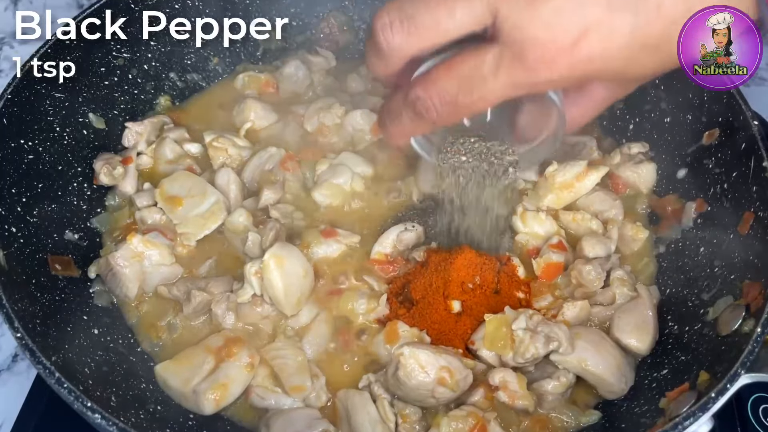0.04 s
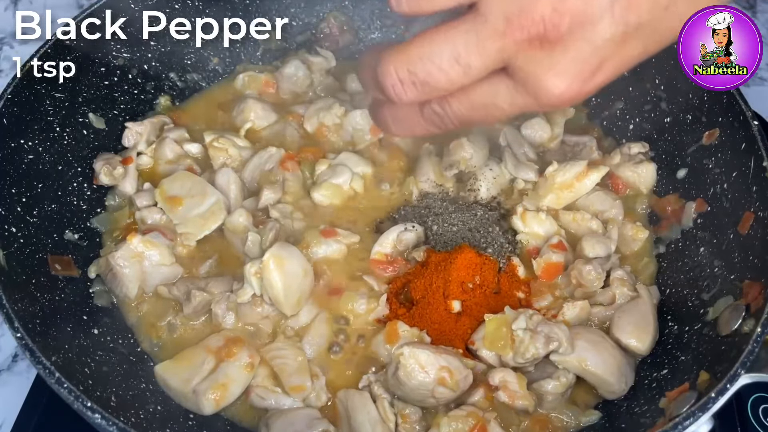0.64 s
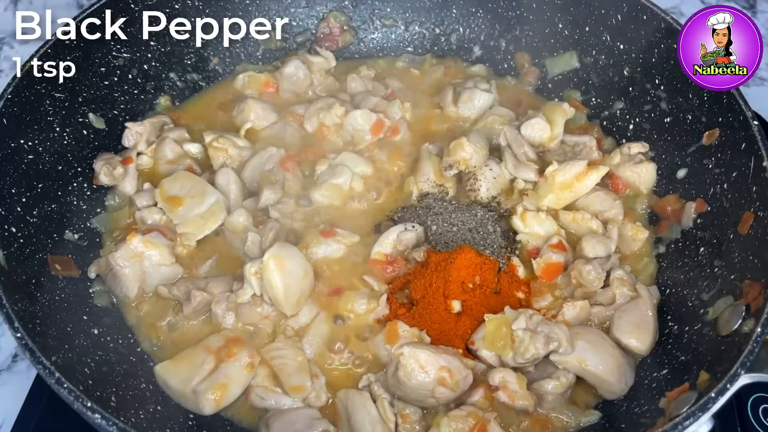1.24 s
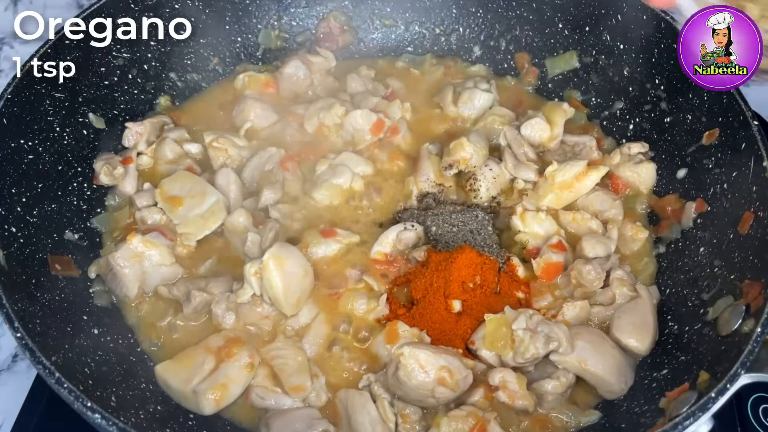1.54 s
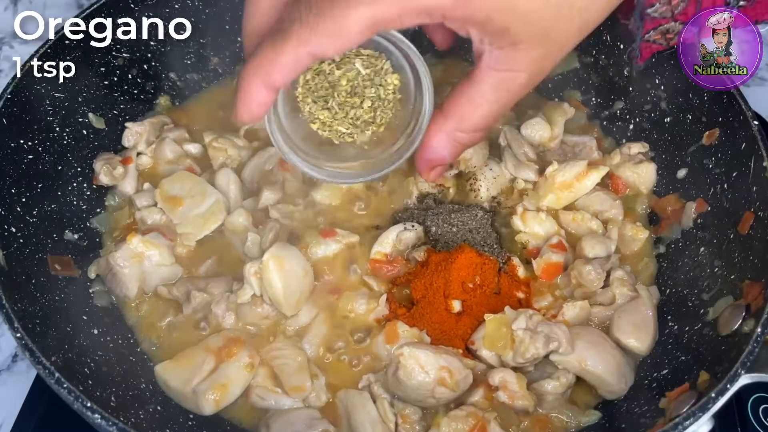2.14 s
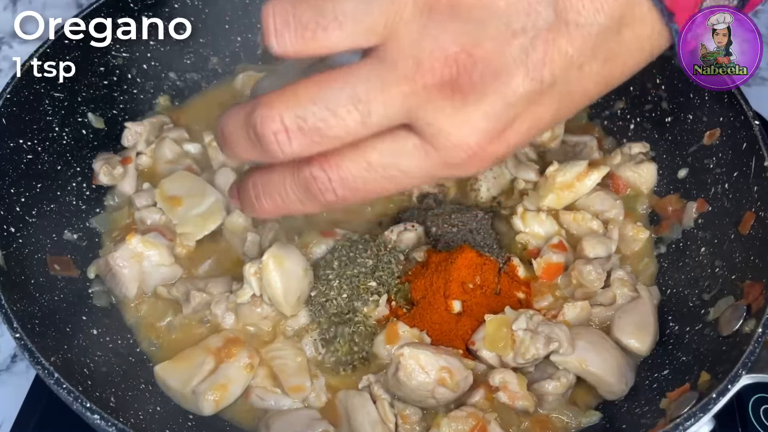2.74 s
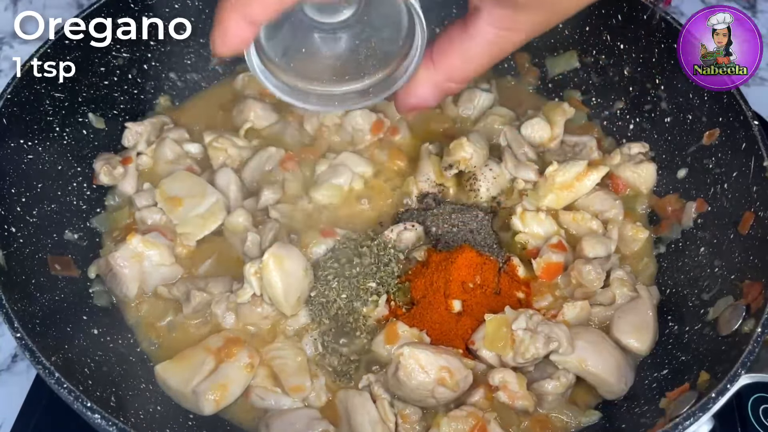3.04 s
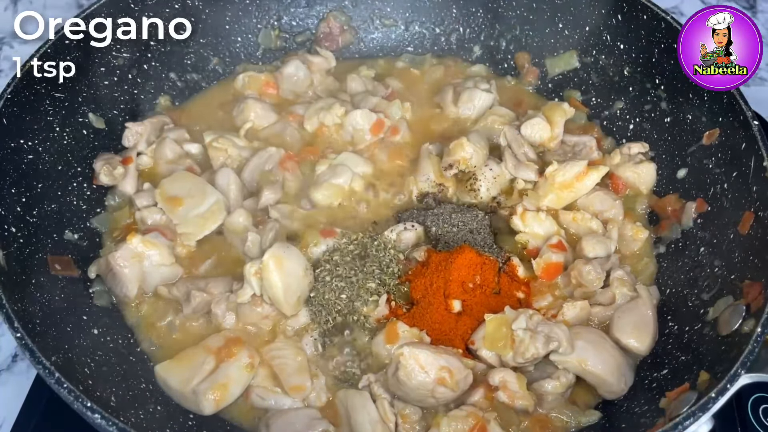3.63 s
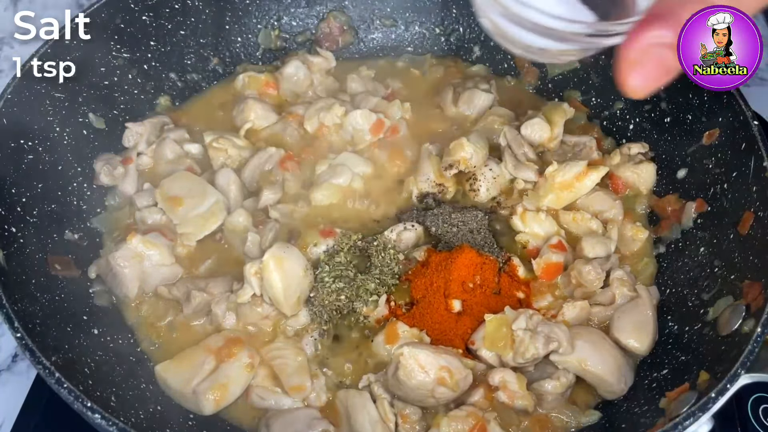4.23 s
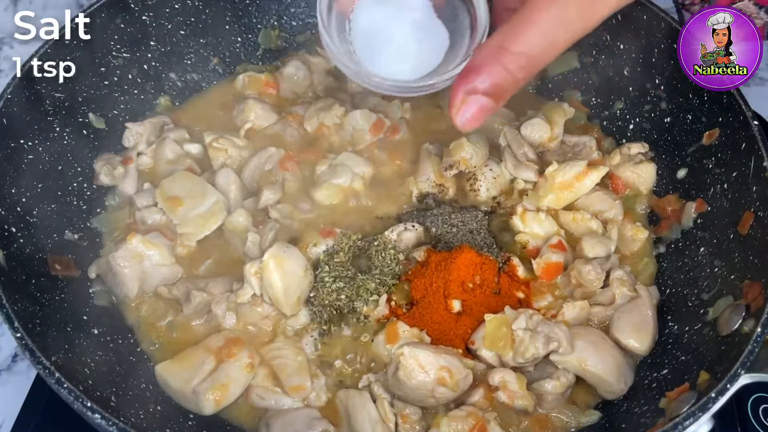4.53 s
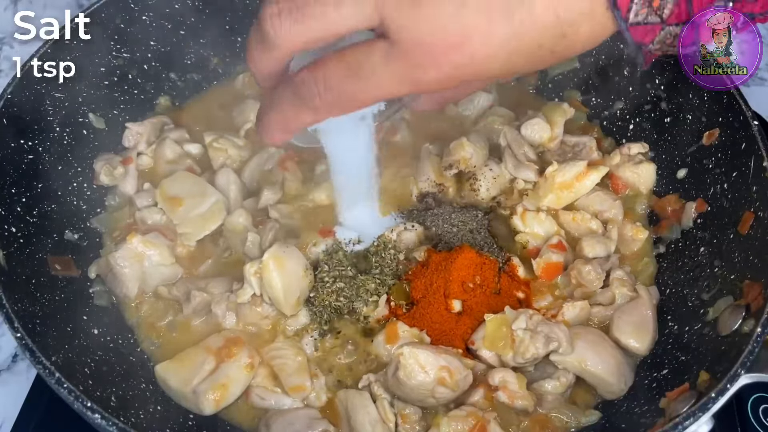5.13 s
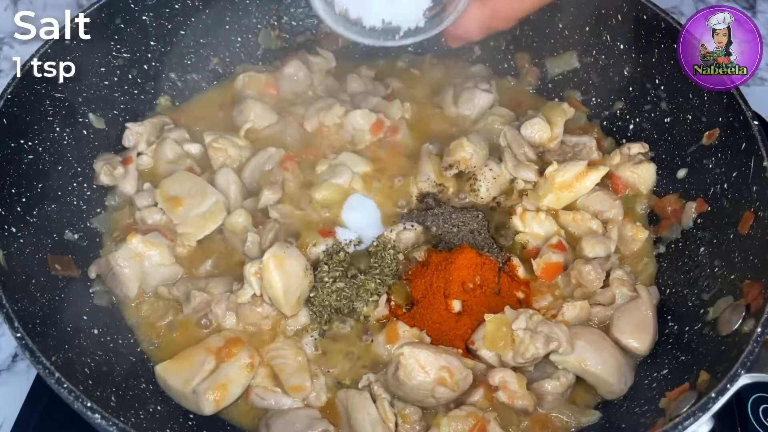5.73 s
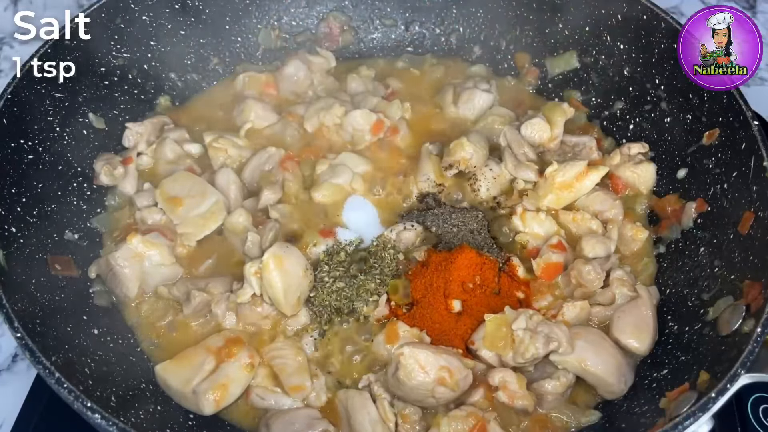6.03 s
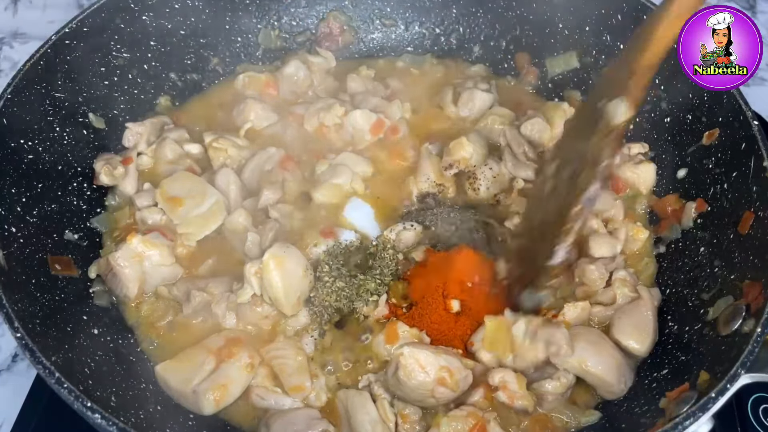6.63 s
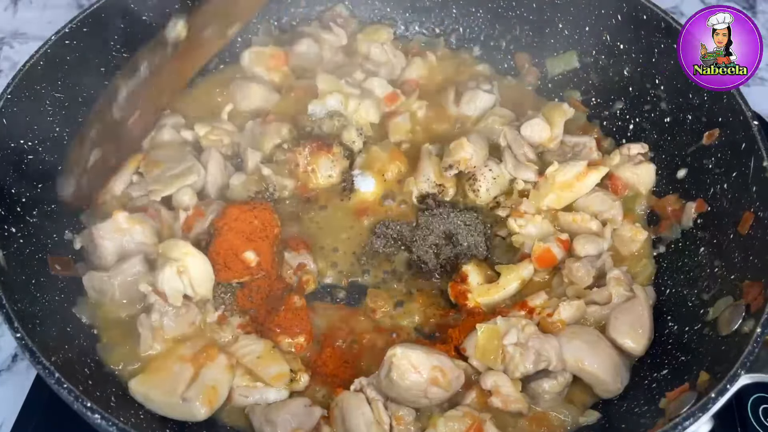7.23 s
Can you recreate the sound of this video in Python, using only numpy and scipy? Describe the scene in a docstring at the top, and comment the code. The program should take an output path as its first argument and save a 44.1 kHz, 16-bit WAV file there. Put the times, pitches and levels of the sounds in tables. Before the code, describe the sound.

Chicken bubbles and sizzles in sauce in a wok, pausing briefly at times, until a wooden spatula knocks and stirs up a hiss.

```python
"""Chicken simmers in sauce in a wok, heard close up: bubbles blip, froth bursts, the hot edge sizzles.
A hand hovers to add spices, and the gap under it colours the sizzle with gliding resonances.
The boil stops short each time the induction hob pauses its heat, while the hob's fan hums on.
Warm air buffets the microphone and a bird chirps far off. At the end a wooden spatula knocks the pan
and pushes the food over hot metal, which hisses up."""
import sys
import numpy as np
from scipy import signal
from scipy.fft import rfft, irfft, next_fast_len
from scipy.io import wavfile
from scipy.ndimage import uniform_filter1d, map_coordinates

SR = 44100
rng = np.random.default_rng(int(sys.argv[2]) if len(sys.argv) > 2 else 0)


def dump_mix(stems):
    """Bounce the given channels to the path in sys.argv[1] as a 16-bit WAV at rate SR."""
    frames = np.atleast_2d(stems).T  # one column per channel
    limited = np.clip(frames, -1, 1)  # hard clip at full scale
    pcm = np.round(limited * 32767).astype(np.int16)
    wavfile.write(sys.argv[1], SR, pcm)


N = 325017
TIME = np.arange(N) / SR

# tone curves of the layers: frequency_hz, level_db
SAUCE_TONE = [(40, -26), (100, -16), (190, 6), (300, -4.5), (400, -1.5), (600, -4.5), (850, -10.5),
              (1200, -20.5), (2000, -42), (5000, -74)]
FROTH_TONE = [(80, -34), (400, -2), (750, -1.5), (1080, 3), (1400, 0), (1800, -1.6), (2400, -5.5),
              (3200, -12), (4500, -15), (8000, -48)]
SIZZLE_TONE = [(1200, -13), (2200, -11.5), (3000, 4), (3700, 1), (4400, -3), (5200, 0), (6300, -3.5),
               (7500, -0.5), (9000, -28), (13000, -27)]
SPRAY_TONE = [(3000, -27), (6000, -11), (7700, -5), (8600, 2.5), (10000, 1.5), (11500, -2), (12700, -10.5),
              (13900, -16), (15500, -37)]
FAN_TONE = [(25, -27), (60, 9.5), (150, 4), (350, -3), (600, -6.5), (850, -14.5), (1150, -13.5),
            (2000, -30), (5000, -29), (10000, -39), (15000, -67)]
AIR_TONE = [(5, -38), (14, -5.5), (45, 1.5), (85, 0), (130, -3.5), (200, -12), (320, -24), (700, -88),
            (2000, -91)]
HISS_TONE = [(400, -22), (750, -2), (1250, 1), (1850, 1.5), (2250, -3.5), (3200, -.3), (4400, -4),
             (5100, -3), (6300, -5.5), (7600, -2.5), (9000, -39), (13000, -23)]
# narrow steady low tones, like the fan's, and two broad mid peaks colouring the boil:
# pitch_hz, width_hz, lift_db
COLOUR_PEAKS = [(380, 40, 4), (463, 20, 3), (565, 18, 3), (687.5, 30, 3.5), (1850, 260, 3.8),
                (2440, 340, 1.8)]
# rafts of froth burst at once: start_s, length_s, relative_db
FROTH_BURSTS = [(0.004, 0.039, -42), (0.486, 0.045, -28), (0.56, 0.044, -29.5), (0.79, 0.05, -32),
                (.93, .16, -33.5), (1.25, 0.15, -32.5), (1.57, 0.052, -29), (1.68, 0.075, -35.5),
                (1.86, 0.13, -29.5), (2.09, 0.059, -28), (2.28, 0.18, -33.5), (2.827, 0.03, -32),
                (3.02, 0.031, -27.5), (3.18, 0.059, -34), (3.52, 0.089, -33.5), (3.94, 0.15, -37),
                (4.392, 0.051, -27), (4.458, 0.11, -29.5), (4.73, 0.041, -31), (5.03, 0.088, -38),
                (5.68, 0.082, -33), (5.844, 0.068, -27.5), (6.243, 0.085, -30)]
# juice runs onto the hot edge and fries: start_s, length_s, sizzle_relative_db, spray_relative_db
JUICE_SPURTS = [(0, 0.027, -37, -49), (0.552, 0.063, -33.5, -51.5), (0.8, 0.094, -34.5, -65),
                (1.12, 0.12, -39, -53), (1.586, 0.05, -32.5, -65), (1.816, 0.13, -35, -51),
                (1.95, 0.053, -38, -73), (2.087, 0.038, -32.5, -45), (2.31, 0.04, -34.5, -44),
                (2.382, 0.064, -32.5, -63), (2.596, 0.025, -34, -65), (2.8, .06, -36, -57),
                (3.02, 0.032, -33.5, -44), (3.373, 0.028, -39, -49), (3.942, 0.061, -37.5, -47.5),
                (4.033, 0.14, -40, -50), (4.368, 0.11, -36.5, -55.5), (4.516, 0.041, -33, -57),
                (4.582, 0.11, -35.5, -47), (4.76, 0.034, -33.5, -74), (4.87, 0.097, -33, -49),
                (5.03, 0.19, -42, -59), (5.246, 0.058, -35, -46), (5.36, 0.078, -42, -49),
                (5.623, 0.12, -35, -48), (5.834, 0.046, -33, -45), (6.216, 0.063, -37.5, -47),
                (6.344, 0.031, -37, -49), (6.558, 0.023, -45, -43), (6.636, 0.091, -31, -46)]
# the first glide is a brief squeak as pepper pours from the hand; after it, the gap under the hand rings, one
# glide per movement: time_s, pitch_hz, lift_db
HAND_RINGS = [
    [(0, 2580, 16), (.08, 2600, -1.5)],
    [(.45, 2760, 2), (.6, 2600, 1), (.7, 2370, 3), (.82, 2200, 5), (1, 1900, 3), (1.15, 1700, 1)],
    [(2.25, 2700, 6), (2.39, 2740, 13.5), (2.5, 2760, 9)],
    [(2.7, 2350, 1), (2.86, 2240, 11), (2.97, 2120, 3), (3.12, 2030, 9), (3.2, 1910, 6), (3.35, 1850, 2)],
    [(4.3, 2520, 8), (4.52, 2800, 9.5), (4.68, 2720, 0)],
    [(4.68, 2000, -2), (4.77, 2000, 6.5), (4.95, 2250, 4), (5.06, 2400, 11), (5.2, 2480, 11),
     (5.35, 2580, 4.5), (5.55, 2520, 8), (5.8, 2310, 7)],
]
# the hand's echo cancels other pitches, one list per glide: time_s, pitch_hz, cut_db
HAND_NOTCHES = [
    [(.05, 3400, 3), (.2, 3500, 5), (.45, 3460, 2)],
    [(1.95, 2300, 3.5), (2.2, 2660, 14), (2.55, 2520, 10), (2.8, 2550, 5), (3.1, 2550, 2)],
    [(2.12, 2720, 3.5), (2.22, 3200, 13), (2.4, 3320, 3), (2.62, 3330, 1), (3, 2920, 9), (3.25, 2580, 10)],
    [(4.15, 1940, -3), (4.27, 1970, 4), (4.5, 2180, 1), (4.75, 2270, -3)],
    [(4.88, 1630, 0.5), (4.98, 1810, 3), (5.18, 2030, 5), (5.33, 1900, 32), (5.42, 1980, 5), (5.6, 1870, 3),
     (5.9, 1480, 8)],
    [(4.9, 3330, 0), (4.98, 3330, 7), (5.3, 3400, 1)],
]
# the hand screens the treble: time_s, gain_db
HAND_SHADE = [(2.1, -2), (2.55, -2), (2.95, -4), (3.15, -0.5)]
# mains and fan tones: pitch_hz, relative_db
HUM_TONES = [(100, -33), (136, -39), (225, -40), (238, -38), (272, -61), (715, -72), (953, -56.5)]
# bed of calm air at the microphone: time_s, level_db
AIR_BED = [(0, -26), (5.7, -27.5), (6.42, -31), (6.6, -27)]
# wafts of warm air: start_s, length_s, level_db
WAFTS = [(.16, 0.38, -25), (.54, 0.35, -20.5), (1.26, 0.11, -23.5), (1.51, 0.2, -24), (1.92, 0.13, -26.5),
         (2.45, 0.29, -28), (3.92, 0.32, -33), (5.18, 0.13, -23), (5.41, 0.16, -29), (7.12, 0.2, -31)]
# rising steam thumps the microphone: centre_s, peak_db, pitch_hz
STEAM_PUFFS = [(0.562, -5, 69), (.661, -27, 70), (0.712, -10.5, 54.7), (0.845, -5.5, 79),
               (6.624, -13, 75.6), (6.702, -15, 50.5), (7.066, -16, 44.7)]
# single bubbles spit at the surface: start_s, level_db, pitch_hz
SPITS = [(.018, -21, 7300), (.085, -20, 8400), (.2578, -18, 8200), (.305, -17.5, 4800), (.707, -20, 7600),
         (.815, -18, 2290), (.82, -15, 7500), (.916, -20, 6400), (1.1007, -19, 7000), (1.2034, -22, 5900),
         (1.2587, -22, 6400), (1.598, -20, 6400), (1.711, -21, 4600), (1.8345, -18, 6200),
         (2.097, -17.5, 7300), (2.1095, -22, 4800), (2.492, -21, 7700), (2.505, -22, 5250),
         (2.557, -22, 5100), (2.812, -19, 4050), (2.848, -19, 2300), (3.017, -22, 7100), (3.15, -21, 7300),
         (3.389, -13, 8000), (3.6545, -21, 8500), (3.788, -25, 7400), (3.872, -23, 8500),
         (3.9977, -19, 8400), (4.08, -19, 6000), (4.148, -19, 6200), (4.304, -15, 6600),
         (4.3356, -21, 7750), (4.4045, -21, 6500), (4.446, -16, 6700), (4.823, -17, 9000),
         (5.074, -18, 8200), (5.107, -19, 9000), (5.26, -19, 7200), (5.361, -20, 5000),
         (5.396, -11.5, 8200), (5.4415, -15, 7500), (5.449, -16, 9700), (5.4816, -17, 8600),
         (5.631, -15.5, 5170), (5.838, -19, 9500), (5.865, -15, 3280), (6.0465, -17, 8000),
         (6.181, -15.5, 7600), (6.2365, -17, 7600), (6.356, -19, 9000), (6.3624, -15.5, 7500),
         (6.717, -15, 7350)]
# clusters of big bubbles well up: start_s, length_s, level_db, pitch_hz
GULPS = [(0.51, 0.14, -32.5, 388), (0.92, 0.13, -33.5, 514), (1.206, 0.066, -33.5, 376),
         (1.832, 0.12, -34.5, 355), (1.992, .25, -37.5, 620), (2.352, 0.14, -29.5, 380),
         (2.727, 0.065, -33.5, 564), (3.281, 0.083, -34.5, 404), (3.518, 0.098, -40, 536),
         (3.871, .22, -32.5, 397), (4.228, .22, -31.5, 458), (4.45, .14, -37, 590), (5.44, 0.13, -37, 346),
         (5.609, .1, -34.5, 350), (5.837, 0.074, -35.5, 550)]
# the heat cuts out: start_s, recovery_s, depth_share
HEAT_PAUSES = [(1.395, 0.2, 0.89), (3.696, 0.22, 0.93), (6.377, 0.21, 0.91)]
# the boil through a full-depth pause: recovery_share, gain_db
BOIL_RECOVERY = [(0, -8), (.01, -32), (.2, -11.5), (.47, -15), (.71, -2.5), (1, -0.5)]
# the bird's slurred notes: start_s, length_s, from_hz, to_hz, level_db
BIRD_SLURS = [(5.425, 0.055, 6700, 4300, -37.5), (5.582, 0.059, 6800, 4600, -38.5),
              (6.531, 0.023, 4620, 2700, -37), (6.561, .03, 2920, 5150, -36.5)]
# pitch zigzag of one chip in the trill: time_s, pitch_hz
CHIP_CONTOUR = [(0, 3000), (.0035, 4610), (.0063, 3600), (.009, 4720), (.012, 3600), (.0145, 4520),
                (.017, 3900)]
# the spatula's edge catches on the pan: start_s, length_s, level_db, pitch_hz
SPATULA_SCRAPES = [(6.7075, .006, -28.5, 3000), (6.713, .010, -35, 2700), (6.7285, .006, -23.5, 2350),
                   (6.737, .008, -34, 2500)]
# the spatula knocks: start_s, level_db, pitch_hz
SPATULA_KNOCKS = [(6.7085, -11, 2860), (6.7298, -21, 2320), (6.821, -22, 1840), (6.977, -14, 2700)]
# the hiss surges under each push: start_s, length_s, level_db
SPATULA_PUSHES = [(6.8, 0.08, -28.5), (6.9, 0.094, -27.5)]
# stereo image by frequency: frequency_hz, likeness_share, left_lead_rad, left_over_right_db
STEREO_IMAGE = [(60, 1, 0, 0.5), (150, 0.91, 0, -0.2), (395, 0.94, 0, 0), (840, 0.69, 0.7, -0.5),
                (1040, 0.74, 0.62, 0.5), (1880, 0.81, 0.35, 1), (3120, 0.74, 1.25, 1.7),
                (3930, 0.81, 0.5, 1.5), (4470, 0.31, 1.5, 6), (5800, 0.35, 0.5, 1.5), (6630, 0.41, -1, 4),
                (7860, 1, -3, -4.5), (8510, 1, -3, 0), (9390, 0.26, -4.5, 1.5), (11240, 1, -7.5, -1),
                (12900, 0.59, -3.5, 0)]

SWELL_S = 0.033  # rise and fall of a burst, spurt, waft or push
TOP_HZ = 13750


def amp(db):
    """Decibels to gain."""
    return 10 ** (np.asarray(db) / 20)


def unit(x):
    """Scale to rms 1."""
    return x / np.sqrt(np.mean(x ** 2) + 1e-20)


def along(points, hz, column=1):
    """One column of a table read on a log-frequency axis."""
    table = np.transpose(points)
    return np.interp(np.log(hz + 1), np.log(table[0] + 1), table[column])


def wobble(rate):
    """A smooth random curve, rate knots a second."""
    coarse = TIME[::32]
    curve = map_coordinates(rng.standard_normal(2048), [coarse * rate], mode="wrap")
    return np.interp(TIME, coarse, curve)


def swells(rows, column=2):
    """Gain envelope of events that rise, hold and fall; column holds their level in dB."""
    t = TIME[::32]
    gain = np.zeros(len(t))
    for row in rows:
        inside_s = np.minimum(t - row[0], row[0] + row[1] - t)
        gain += amp(row[column]) * np.clip(.5 + inside_s / SWELL_S, 0, 1)
    return np.interp(TIME, t, gain)


def filtered(x, response):
    """Filter x by a complex response of frequency."""
    size = next_fast_len(N + SR // 2)
    return irfft(rfft(x, size) * response(np.fft.rfftfreq(size, 1 / SR)), size)[..., :N]


def add(track, start_s, sound):
    """Mix a sound into a track."""
    part = track[max(round(start_s * SR), 0):][:len(sound)]
    part += sound[:len(part)]


def kitchen(x, wet_db, t60_s, length_s):
    """Add the echo of worktop and walls, a decaying stereo noise tail."""
    t = np.arange(int(length_s * SR)) / SR
    tail = rng.standard_normal((2, len(t))) * amp(-60 * t / t60_s)
    return x + amp(wet_db) * signal.fftconvolve(x, tail / np.linalg.norm(tail[0]), axes=1)[:, :N]


def coloured(x, tone):
    """Shape a source by its tone curve and lift narrow low tones and two broad mid peaks; rms 1."""
    def response(hz):
        lift_db = sum(db / (1 + (2 * (hz - centre) / width) ** 2) for centre, width, db in COLOUR_PEAKS)
        return amp(along(tone, hz) + lift_db)
    return unit(filtered(x, response))


def patchy(x, depth_db):
    """Each patch of bubbles has its own colour for a few tens of milliseconds."""
    spectrum = signal.stft(x, nperseg=512)[2]
    colour = uniform_filter1d(rng.standard_normal(spectrum.shape[1:]), size=11, axis=0)
    colour = uniform_filter1d(colour, size=7, axis=1)
    return signal.istft(spectrum * amp(depth_db * unit(colour)), nperseg=512)[1][:, :N]


def crackle(rate, spread_db):
    """Two streams of tiny bursts of unequal size, rate a second."""
    fired = rng.random((2, N)) < rate / SR
    size = amp(spread_db * np.clip(rng.standard_normal((2, N)), -3, 3))
    return unit(fired * size * rng.choice([-1, 1], (2, N)))


def bubbles(count, centre_hz, spread, cycles, spread_db):
    """Two streams of bubbles that ring briefly, rising in pitch as they surface."""
    t = np.arange(0, cycles / centre_hz, 1 / SR)
    envelope = np.linspace(1, 0, len(t)) ** 2 * (1 - np.exp(-2 * centre_hz * t))
    streams = []
    for _ in range(2):
        onsets = (rng.random((count, 1)) * N).astype(int)
        hz = centre_hz * np.exp(spread * rng.standard_normal((count, 1)))
        gain = amp(spread_db * np.minimum(rng.standard_normal((count, 1)), 1.5))
        rings = gain * envelope * np.sin(2 * np.pi * hz * t * (1 + 0.033 * t / t[-1]))
        samples = onsets + np.arange(len(t))
        streams.append(unit(np.bincount(samples.ravel(), rings.ravel(), N)[:N]))
    return np.array(streams)


def ticks(rows, cycles, scatter_db, scatter_t60_s):
    """Short damped pings, each scattered briefly by the bowl of the wok."""
    out, t = np.zeros((2, N)), np.arange(SR // 16) / SR
    for start, db, hz in rows:
        ping = amp(db) * np.exp(-hz * t / cycles) * np.sin(2 * np.pi * hz * t)
        add(out[0], start, ping)
        for track in out:
            tail = rng.standard_normal(len(t)) * amp(-60 * t / scatter_t60_s)
            add(track, start, amp(scatter_db) * signal.fftconvolve(ping, tail / np.linalg.norm(tail)))
    return out


def sauce():
    """The body of the boil: big bubbles blip low in the sauce."""
    blips = bubbles(count=1800, centre_hz=498.6, spread=0.384, cycles=21, spread_db=5)
    bed = coloured(patchy(crackle(rate=3000, spread_db=2.5), depth_db=1.5), SAUCE_TONE)
    return amp(-31.5 + 0.9 * wobble(9.1)) * (bed + amp(-8.5) * blips)


def froth(surge, flutter):
    """The mids: small bubbles ping in the froth, and whole rafts burst at once."""
    pings = bubbles(count=1700, centre_hz=1977, spread=.3, cycles=47, spread_db=2)
    bed = coloured(patchy(crackle(rate=4500, spread_db=1.5), depth_db=2.15), FROTH_TONE)
    gain = np.hypot(amp(-36.5 + 0.59 * surge), amp(-5.5) * swells(FROTH_BURSTS)) * amp(.5 * flutter)
    return gain * (bed + amp(-9) * pings)


def edge_sizzle(surge, flutter):
    """The top end: the smallest bubbles fry at the hot edge under a fine spray, flaring at each spurt."""
    edge_db = 2.3 * surge - 0.0357 * TIME
    fizz = bubbles(count=3200, centre_hz=4390, spread=0.267, cycles=47, spread_db=2)
    bed = coloured(patchy(crackle(rate=5500, spread_db=3.5), depth_db=3), SIZZLE_TONE)
    spray = coloured(patchy(crackle(rate=2900, spread_db=1), depth_db=1.6), SPRAY_TONE)
    sizzle_gain = np.hypot(amp(-40 + edge_db), amp(-2) * swells(JUICE_SPURTS))
    spray_gain = np.hypot(amp(-49.5 + edge_db), amp(2.5) * swells(JUICE_SPURTS, column=3))
    sizzle = bed + amp(-5.5) * fizz
    return sizzle_gain * amp(1.52 * flutter) * sizzle + spray_gain * amp(2.1 * flutter) * spray


def bell(hz, centre, width):
    """A bump around a centre frequency, its width a share of the centre."""
    return np.exp(-((hz / centre - 1) / width) ** 2)


def hollows(x, count, typical_hz=2575, fade_s=0.058, depth_db=4.4):
    """Gaps between the pieces open and close, each briefly lifting or dipping a drifting pitch."""
    hz, times, spectrum = signal.stft(x, SR, nperseg=1024)
    lift_db = np.zeros(spectrum.shape[1:])
    moments = rng.random(count) * times[-1]
    glides = rng.standard_normal((count, 2))
    for when, (pitch, drift), sign in zip(moments, glides, rng.choice([-1, 1], count)):
        near = abs(times - when) < 2 * fade_s
        t = times[near] - when
        centre = typical_hz * np.exp(0.354 * pitch + 0.43 * drift * t)
        envelope = np.exp(-(t / fade_s) ** 2)
        lift_db[:, near] += sign * depth_db * envelope * bell(hz[:, None], centre, width=.065)
    return signal.istft(spectrum * amp(np.minimum(lift_db, depth_db)), nperseg=1024)[1][:, :N]


def simmer():
    """The whole boil: froth and edge surge and flutter together, and every layer follows the heat."""
    flutter = np.minimum(unit(.6 * wobble(40) + wobble(150)), 1.7)
    surge = np.minimum(wobble(14), 1)
    frying = froth(surge, flutter) + edge_sizzle(surge, flutter)
    return amp(boil_dip_db()) * (sauce() + gulps() + hollows(frying, count=380))


def under_hand(x, shade_hz=4600):
    """The gap under the hand rings at a gliding pitch; the hand's echo cuts notches; the treble dulls."""
    hz, times, spectrum = signal.stft(x, SR, nperseg=1024)

    def glide(rows, width):
        at, centre, db = np.transpose(rows)
        band = bell(hz[:, None], np.interp(times, at, centre), width)
        return np.interp(times, at, db) * band * (times < at[-1])
    rings_db = sum(glide(rows, width=0.07) for rows in HAND_RINGS)
    notches_db = sum(glide(rows, width=0.1) for rows in HAND_NOTCHES)
    treble = 1 - np.exp(-(hz[:, None] / shade_hz) ** 4)
    shade_db = np.interp(times, *np.transpose(HAND_SHADE)) * treble
    return signal.istft(spectrum * amp(rings_db - notches_db + shade_db), nperseg=1024)[1][:, :N]


def hob():
    """The cooling fan rushes; fan and coil hum unsteadily, and the hum ducks as the coil cuts out."""
    out = amp(-36) * unit(filtered(rng.standard_normal((2, N)), lambda hz: amp(along(FAN_TONE, hz))))
    duck = amp(.15 * boil_dip_db())
    for hz, db in HUM_TONES:
        gain = duck * amp(db + 2.5 + 1.8 * wobble(6))
        out[0] += gain * np.sin(2 * np.pi * hz * TIME + 0.71 * wobble(7))
    return out


def draught():
    """Warm air and steam rumble on the microphone, with wafts and a few thumping puffs."""
    bed_db = np.interp(TIME, *np.transpose(AIR_BED)) + 1.3 * wobble(14)
    rumble = unit(filtered(rng.standard_normal(N), lambda hz: amp(along(AIR_TONE, hz))))
    air = amp(0.083 * boil_dip_db()) * np.hypot(amp(bed_db), swells(WAFTS)) * rumble
    for centre_s, db, hz in STEAM_PUFFS:
        turns = (TIME - centre_s) * hz
        air -= amp(db) * np.exp(-(turns / 0.64) ** 2) * np.cos(2 * np.pi * turns)
    return air


def spits(pip_count, pip_hz=6200, drop_delay_s=.004):
    """Bubbles snap and throw drops that tick just after; smaller pips ping while the heat is on."""
    drops = []
    for start, db, hz in SPITS:
        drop_db = db - 11 + 1.1 * max(db + 17.5, 0)  # loud spits throw heavier drops
        for delay, detune in zip(rng.exponential(drop_delay_s, size=4), rng.standard_normal(4)):
            drops.append((start + delay, drop_db, hz * np.exp(.25 * detune)))
    starts = rng.random(pip_count) * TIME[-1]
    size, detune = np.minimum(rng.standard_normal((pip_count, 2)), 2).T
    pip_rows = zip(starts, -31 + 2.5 * size, pip_hz * np.exp(.17 * detune))
    snaps = ticks(SPITS + drops, cycles=2.7, scatter_db=-6, scatter_t60_s=.02)
    pips = ticks(pip_rows, cycles=6, scatter_db=-7, scatter_t60_s=.015)
    return snaps + amp(boil_dip_db()) * pips


def gulps(count=36, spread=.33, cycles=1.5):
    """Each gulp is a crowd of big bubbles of mixed size that plop in quick succession."""
    out, t = np.zeros((2, N)), np.arange(SR // 4) / SR
    for start, length, db, hz in GULPS:
        for track in out:
            age = np.maximum(t - .7 * length * rng.random((count, 1)), 0)
            turns = age * hz * np.exp(spread * rng.standard_normal((count, 1)))
            envelope = np.exp(-turns / cycles) * (1 - np.exp(-turns))
            cluster = (envelope * np.sin(2 * np.pi * turns)).sum(axis=0)
            add(track, start, amp(db) * cluster * np.sqrt(length * SR) / np.linalg.norm(cluster))
    return out


def boil_dip_db():
    """The boil collapses at each pause of the heat and builds up again."""
    return sum(depth * np.interp((TIME - start) / length, *np.transpose(BOIL_RECOVERY), left=0, right=0)
               for start, length, depth in HEAT_PAUSES)


def bird(trill_s=5.791, chip_gap_s=.0686, chip_count=11):
    """A small bird outside: two falling slurs, a growing trill and a down-up flourish, with room echo."""
    song = np.zeros(N)
    trill = [(trill_s + k * chip_gap_s, -39.5 + 0.34 * k, CHIP_CONTOUR) for k in range(chip_count)]
    slurs = [(start, db, [(0, from_hz), (length, to_hz)])
             for start, length, from_hz, to_hz, db in BIRD_SLURS]
    for start, db, contour in trill + slurs:
        at, hz = np.transpose(contour)
        t = np.arange(0, at[-1], 1 / SR)
        pitch_hz = np.interp(t, at, hz) * rng.normal(1, 0.0101)
        phase = 2 * np.pi * np.cumsum(pitch_hz) / SR
        add(song, start, amp(db) * signal.windows.tukey(len(t), .5) * np.sin(phase))
    song *= amp(1.6 * wobble(240))  # the notes waver
    return kitchen(song[None], wet_db=-7.5, t60_s=0.53, length_s=1 / 3)


def spatula():
    """Wood slips roughly on the coating and knocks against the pan."""
    scrapes, hz = np.zeros((2, N)), np.fft.rfftfreq(4096, 1 / SR)
    for start, length, db, pitch in SPATULA_SCRAPES:
        size = int(length * SR)
        slip = irfft(rfft(rng.standard_normal(4096)) * bell(hz, pitch, width=0.33))[:size]
        add(scrapes[0], start, amp(db) * unit(slip * signal.windows.tukey(size, .5)))
    return scrapes + ticks(SPATULA_KNOCKS, cycles=1.5, scatter_db=-1.5, scatter_t60_s=0.08)


def hot_metal_hiss(touch_s=6.755, spread_s=0.11):
    """Wet food spreads over bare hot metal and fries; each push makes the hiss surge."""
    contact = np.clip((TIME - touch_s) / SWELL_S, 0, 1)
    bared = np.clip((TIME - touch_s) / spread_s, 0, 1)
    drag = wobble(55)
    squelch = bubbles(count=3000, centre_hz=2860, spread=0.327, cycles=17, spread_db=1)
    bed = coloured(patchy(crackle(rate=6000, spread_db=2.5), depth_db=2.5), HISS_TONE)
    spray = coloured(crackle(rate=5000, spread_db=4), SPRAY_TONE)
    hiss_gain = np.hypot(contact * amp(-28.5), swells(SPATULA_PUSHES)) * amp(.5 * drag)
    return hiss_gain * (bed + amp(-7.5) * squelch) + bared * amp(-37 + drag) * spray


def stereo_image(pair):
    """Spread a shared and a diffuse stream: left-right likeness, phase lead and balance by frequency."""
    def response(hz):
        likeness, lead_rad, balance_db = (along(STEREO_IMAGE, hz, column) for column in (1, 2, 3))
        angle = np.arccos(np.clip(likeness, 0, 1)) / 2
        shared, diffuse = np.cos(angle), np.sin(angle)
        lean = np.exp(.5j * lead_rad) * amp(balance_db / 2)
        return np.array([[shared * lean, diffuse * lean], [shared / lean, -diffuse / lean]])
    return filtered(pair, response).sum(axis=1)


def scene():
    """The pan in a short room echo and the hob, spread to stereo, with the draught and the bird on top."""
    pan = under_hand(simmer()) + spits(pip_count=110) + spatula() + hot_metal_hiss()
    pan = kitchen(pan, wet_db=-12, t60_s=0.15, length_s=1 / 8)
    return stereo_image(pan + hob()) + draught() + bird()


def record(dry):
    """A brick-wall low-pass trims the very top."""
    return filtered(dry, lambda hz: hz < TOP_HZ)


dry = scene()
out = record(dry)
dump_mix(out)
```